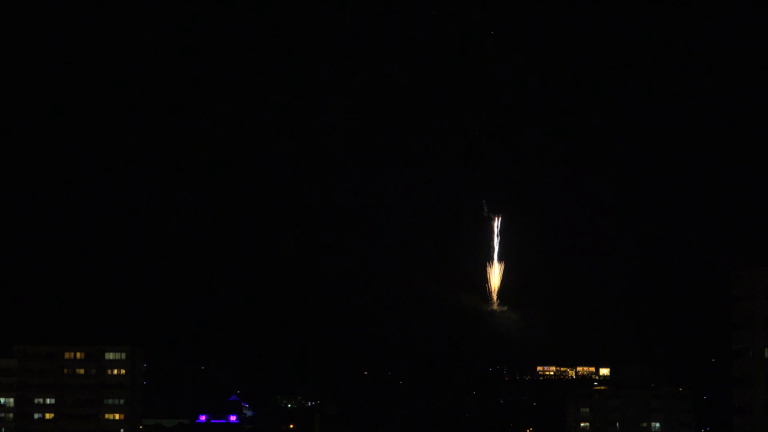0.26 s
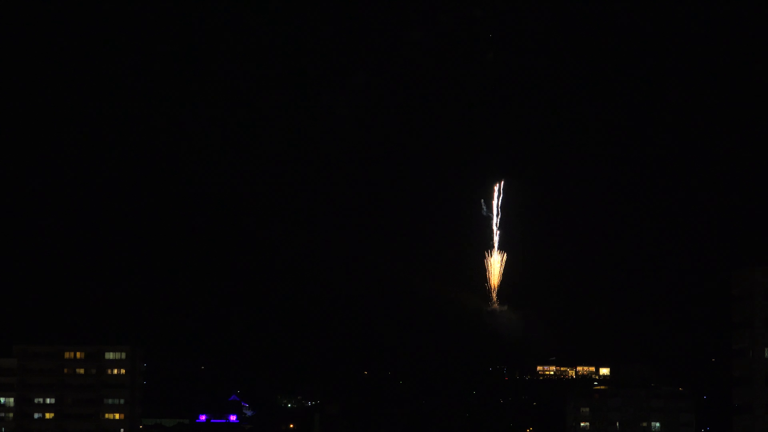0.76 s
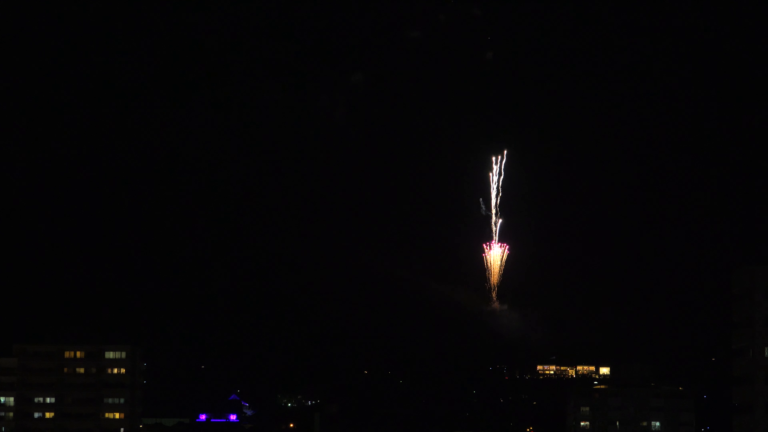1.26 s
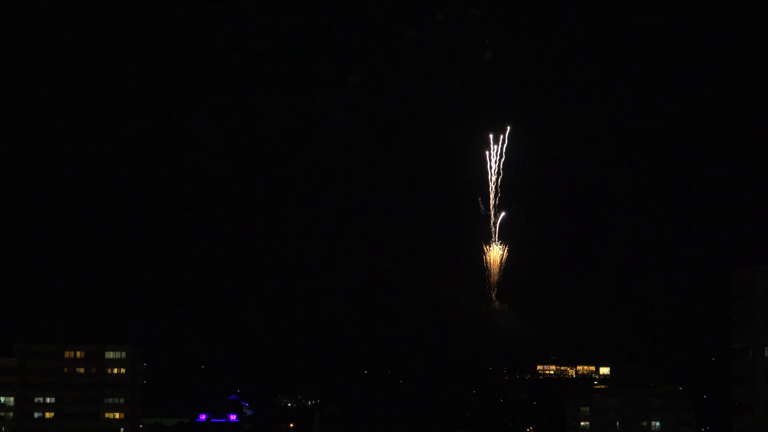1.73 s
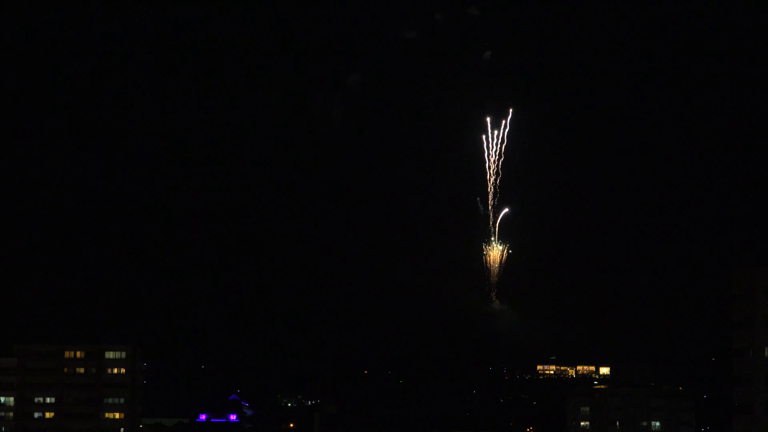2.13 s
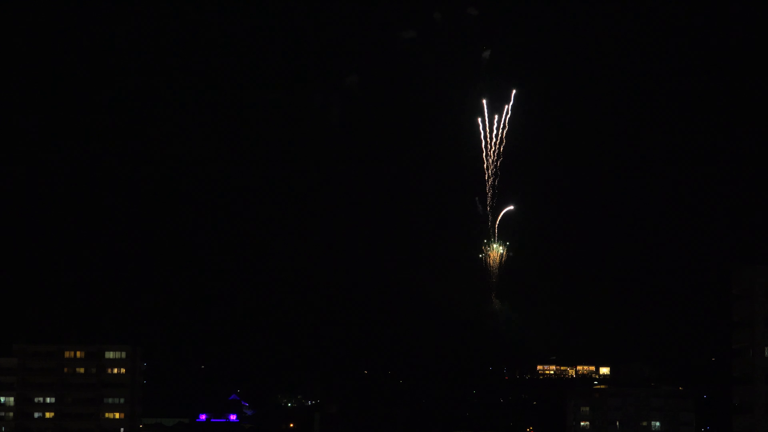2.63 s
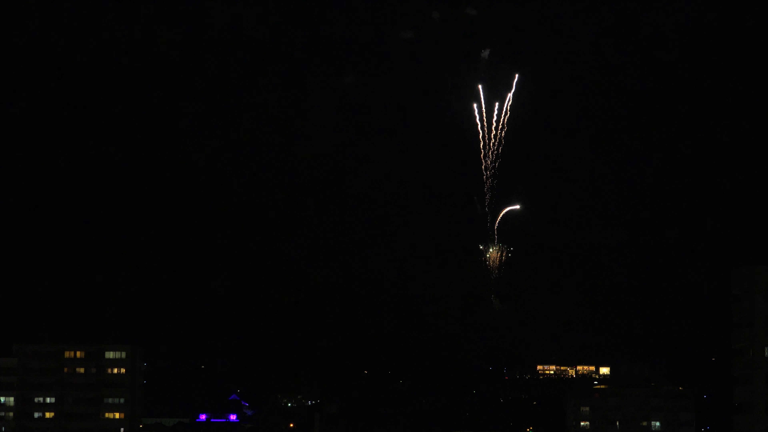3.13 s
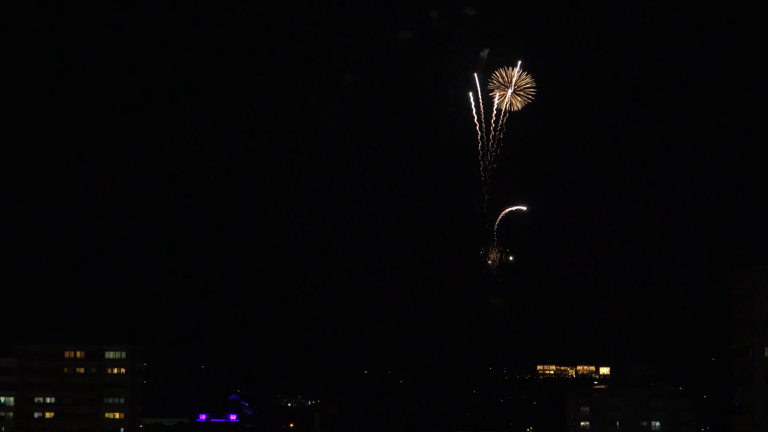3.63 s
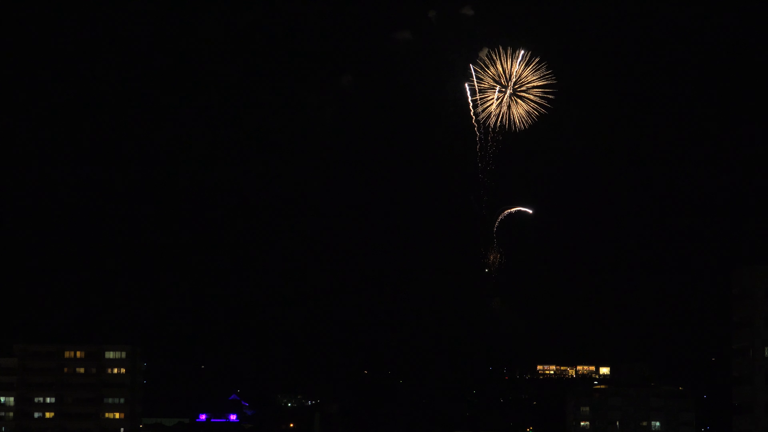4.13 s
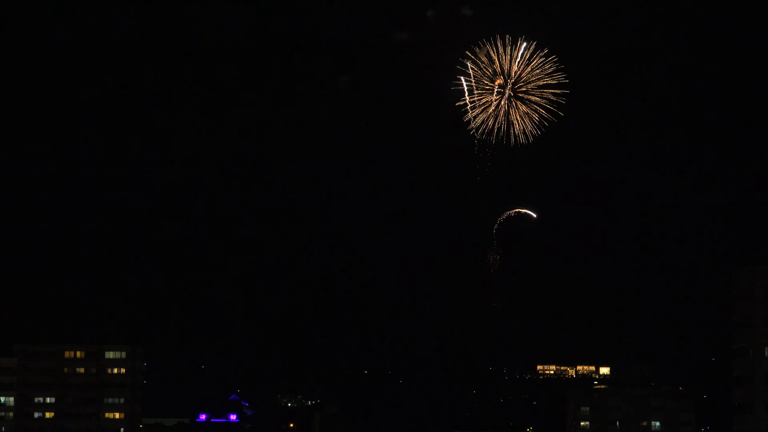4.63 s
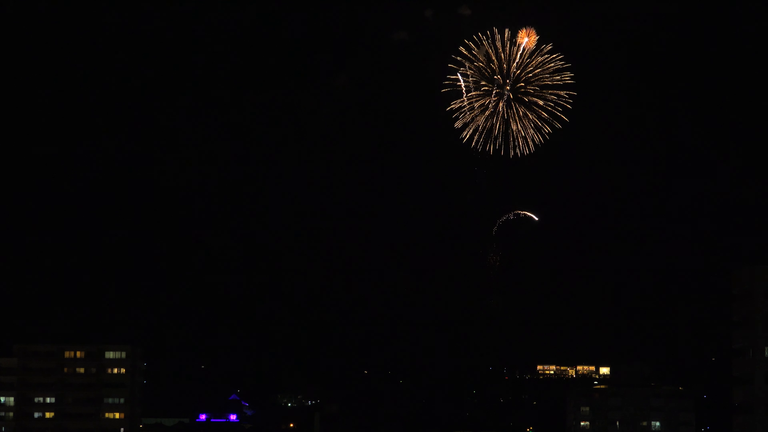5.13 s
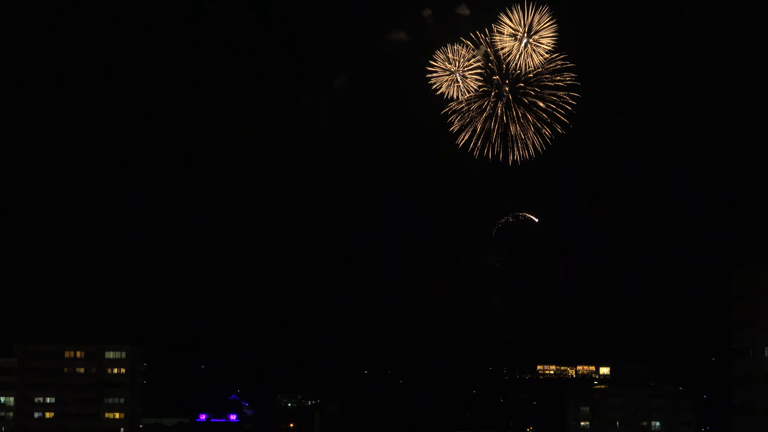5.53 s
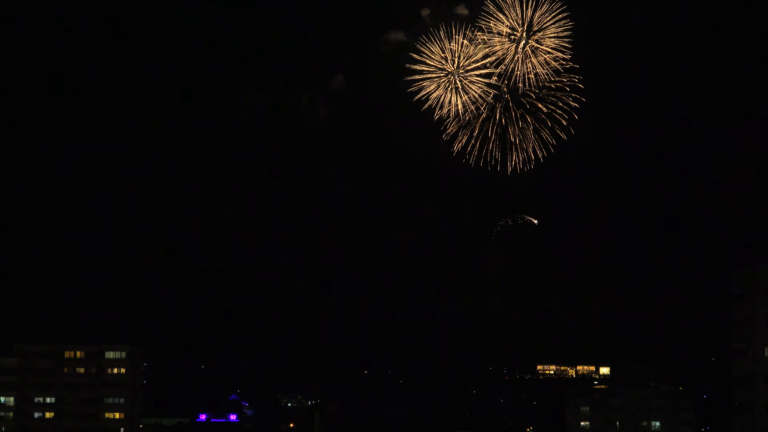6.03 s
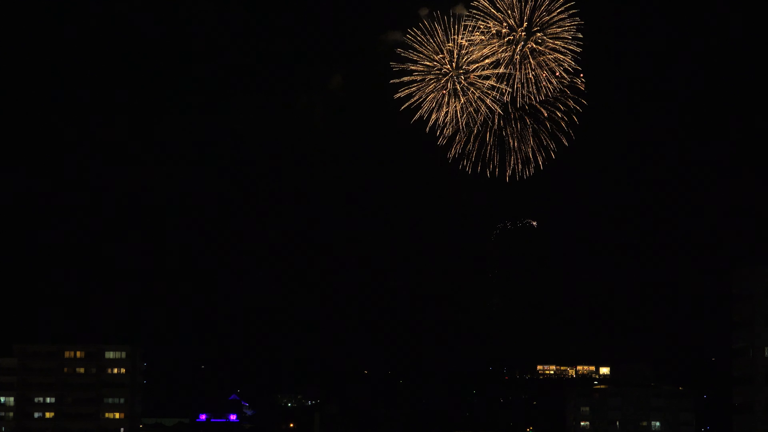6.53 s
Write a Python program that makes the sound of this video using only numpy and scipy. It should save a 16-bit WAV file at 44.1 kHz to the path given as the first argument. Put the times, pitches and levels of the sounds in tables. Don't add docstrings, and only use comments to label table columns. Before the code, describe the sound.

A night city heard in stereo from a balcony: low, slightly uneven distant traffic hum throughout, leaning left, with extremely faint microphone hiss and thin high steady whistles. At about 1.0 s a far firework shell booms, deep and dulled by distance; close walls repeat it within hundredths of a second, giving a short hollow ring. Echoes roll through streets, swelling around 1.5 s, with distinct facade thuds at roughly 1.1, 1.5, 1.75, 2.15 and 2.3 s, then fading. A very faint crackle of burning stars lies around 2.2 s. At 3.87 s a second, stronger boom hits, followed by thuds near 4.1, 4.2, 4.4 and 4.8 s and another rumbling tail. Its dull, faint crackle peaks around 5.1 s. All along, a car approaches from the right, its tyre rush growing gradually, with increasing sizzle, nearest around 6.1 s and still hissing at the end.

```python
import sys
import numpy as np
from scipy import signal
from scipy.io import wavfile
from scipy.ndimage import uniform_filter1d

SR = 44100
rng = np.random.default_rng(int(sys.argv[2]) if len(sys.argv) > 2 else 0)


def field_ratio(decibels):
    return 10 ** (np.asarray(decibels, dtype=float) / 20)


def put_to_file(sound):
    columns = np.atleast_2d(sound).T
    safe = np.clip(columns, -1, 1)
    whole_steps = np.round(safe * 32767)
    wavfile.write(sys.argv[1], SR, whole_steps.astype(np.int16))


N = 298557


def rms_one(x):
    return x / np.sqrt(np.mean(x ** 2) + 1e-20)


def at_hz(points, hz):
    curve_hz, curve_db = np.array(points).T
    return np.interp(np.log(hz), np.log(curve_hz), curve_db)


def band(x, low_hz, high_hz):
    return signal.sosfilt(signal.butter(2, [low_hz, high_hz], "band", fs=SR, output="sos"), x)


def low_pass(x, hz, order):
    return signal.sosfilt(signal.butter(order, hz, fs=SR, output="sos"), x)


def sides(pan_db):
    return field_ratio(np.array([[pan_db / 2], [-pan_db / 2]]))


def stereo(mid, side, alike):
    alike = np.clip(alike, 0, 1)
    return np.sqrt(1 + alike) * mid + np.sqrt(1 - alike) * side * [[1], [-1]]


def drift(rate_hz):
    r = np.exp(-80 * np.pi * rate_hz / SR)
    steps = rng.standard_normal(N // 40 + 2002)
    return rms_one(signal.lfilter([1], [1, -2 * r, r * r], steps)[2000:])


# (pitch_hz, likeness 0 to 1)
LIKENESS = [(60, 0.64), (180, 0.72), (530, 0.66), (1570, 0.37), (4650, 0.02), (13800, 0.03)]
# (pitch_hz, left_over_right_db)
LEAN = [(60, 7.5), (230, 1.5), (910, 1), (3540, 2.0), (13800, -6)]


def banded_noise(spectrum, patchy_db, more_alike, more_left_db, low_hz, high_hz):
    out = np.zeros((2, N))
    together = drift(2.5)
    centres = 25 * 2 ** np.arange(0, 9.2, 1 / 3)
    white = rng.standard_normal((2, 2, N + 8000))
    for k, hz in enumerate(centres[(centres > low_hz) & (centres < high_hz)]):
        flicker = field_ratio(at_hz(spectrum, hz) + patchy_db * (.5 * together + drift(30)))
        gain = np.interp(np.arange(N) / 40, np.arange(len(flicker)), flicker)
        mid, side = band(white[k % 2], hz / 1.122, hz * 1.122)[:, -N:] * gain
        both = stereo(mid, side, at_hz(LIKENESS, hz) + more_alike)
        out += sides(at_hz(LEAN, hz) + more_left_db) * both
    return out / np.sqrt(np.mean(out.mean(axis=0) ** 2))


# (pitch_hz, level_db per Hz)
HUM_TONE = [(15, -57), (25, -19.5), (70, -5.5), (133, -8), (229, -3), (266, -4), (340, -14), (414, -9),
            (504, -11.5), (695, -12.5), (767, -12.5), (981, -10.5), (1530, -16), (2500, -36), (9000, -59.5),
            (11700, -90), (19800, -120)]


def traffic_hum():
    return field_ratio(-44.5) * banded_noise(HUM_TONE, patchy_db=1.0, more_alike=0.066, more_left_db=1.1,
                                     low_hz=20, high_hz=9000)


# (pitch_hz, level_db per Hz)
HISS_TONE = [(4120, -26), (7000, -6), (10400, -9.5), (13300, -3.5), (13500, -2)]


def hiss():
    noise = field_ratio(-83.5) * banded_noise(HISS_TONE, patchy_db=-1.2, more_alike=.01, more_left_db=6.5,
                                      low_hz=4500, high_hz=15000)
    return signal.sosfilt(signal.cheby2(8, 30, 13750, fs=SR, output="sos"), noise)


# (pitch_hz, level_db rms)
WHISTLE_TONES = [(4000, -92), (6001, -98), (10001, -103), (11994, -109), (13937, -98)]


def whistles():
    t = np.arange(N) / SR
    return sum(np.sqrt(2) * field_ratio(db) * np.sin(2 * np.pi * hz * t) for hz, db in WHISTLE_TONES)


def delayed(x):
    lag = 2
    return np.concatenate([np.full(lag, x[0]), x[:-lag]])


def from_left(x):
    return np.array([x[0], delayed(x[1])])


CAR_KM_H, CAR_PASSES_S, CAR_NEAREST_M, SIZZLE_TRAIL_M = 39.3, 6.1, 22.4, 2.7
CAR_NEAREST_DB, CAR_FALL_DB_PER_DECADE = -45.5, 27.5
CAR_BRIGHT_DB, CAR_BRIGHT_FOLLOWS = -2.5, -0.28
SIZZLE_DB, SIZZLE_RISE_DB_PER_S = -2, 5
# (pitch_hz, level_db per Hz)
CAR_TONE = [(180, -35.5), (300, 2), (393, -15.5), (428, -11.5), (611, -0.5), (666, -6), (778, 0),
            (1260, -4.5), (2570, -18), (6310, -31.5), (9000, -59), (11700, -76), (19800, -120)]


def car():
    to_pass_s = np.arange(N) / SR - CAR_PASSES_S
    along_m = CAR_KM_H / 3.6 * to_pass_s
    distance_m = np.hypot(along_m, CAR_NEAREST_M)
    loss_db = CAR_FALL_DB_PER_DECADE * np.log10(distance_m / CAR_NEAREST_M)
    rush = banded_noise(CAR_TONE, patchy_db=0.1, more_alike=0.26, more_left_db=1.5,
                        low_hz=230, high_hz=9000)
    tyres = field_ratio(CAR_NEAREST_DB - loss_db) * rush
    dull = low_pass(tyres, 4100, order=2)
    bright = field_ratio(CAR_BRIGHT_DB - CAR_BRIGHT_FOLLOWS * loss_db) * (tyres - dull)
    trailing = np.roll(tyres, int(SIZZLE_TRAIL_M / CAR_KM_H * 3.6 * SR), axis=1)
    sizzle_gain = field_ratio(SIZZLE_DB + SIZZLE_RISE_DB_PER_S * to_pass_s)
    sizzle = sizzle_gain * band(band(trailing, 5700, 6900), 5700, 6900)
    left, right = dull + bright + sizzle
    return np.array([delayed(left), right])


def clicks(times_s, gains):
    out = np.full(N, 1e-18)
    np.add.at(out, (np.asarray(times_s) * SR).astype(int), gains)
    return out


def blast(x, hz, suction_hz):
    rounded = signal.bessel(4, hz, fs=SR, output="sos", norm="mag")
    suction = signal.butter(1, suction_hz, "high", fs=SR, output="sos")
    return signal.sosfilt(np.vstack([rounded, suction]), x) * SR / hz / 2


def scattered(per_s, spread_db, alike):
    sizes = np.minimum(rng.exponential(1, (2, N)), 5)
    pulses = rng.choice([-1., 1.], (2, N))
    hits = rng.random((2, N)) < per_s / SR
    pulses[hits] *= field_ratio(spread_db * sizes[hits])
    mid, side = pulses * hits + 1e-18
    return stereo(mid, side, alike)


# (pitch_hz, width_hz, level_db)
BALCONY = [(58, 25.3, -2.5), (79, 16.2, 0.5), (92.2, 14.5, 3), (169, 17.6, -1.5), (282.7, 56, -4.5),
           (395, 106, -8), (806, 560, -4.5)]


def balcony(x, direct_db):
    out = field_ratio(direct_db) * x
    for k, (hz, width_hz, db) in enumerate(BALCONY):
        r = np.exp(-np.pi * width_hz / SR)
        ring = [1, -2 * r * np.cos(2 * np.pi * hz / SR), r * r]
        out = out + (-1) ** k * field_ratio(db) * signal.lfilter([1 - r, 0, r - 1], ring, x)
    return out


BURST_S = np.array([.9919, 3.8651])
# (blast_peak_db, low_push_db, wall_scatter_db)
BOOMS = [(-11, -5.5, -22.5), (-6, -6, -22.5)]
WALL_DELAY_S = [.0025, .0052, .0069, .0095, .0128, .0280, .0307]
# (first_shell_db, second_shell_db, left_over_right_db)
WALLS = [(-8, -8, 3), (-7, -4, 1), (-8, -13, 0), (-14, -14, 4), (-2, -22, 3), (-22, -12, 6), (-11, -22, 6)]
PUSH_HZ, PUSH_LAG_S = 79.4, .0032
PUSH_T60_S, SCATTER_T60_S = 0.054, 0.14


def shells():
    blast_db, push_db, scatter_db = np.transpose(BOOMS)
    arrivals = clicks(BURST_S, field_ratio(blast_db)) * sides(3.6)
    for delay_s, (*repeat_db, pan_db) in zip(WALL_DELAY_S, WALLS):
        repeats = clicks(np.add(BURST_S, delay_s), field_ratio(blast_db + repeat_db))
        arrivals = arrivals + repeats * sides(pan_db)
    pulses = blast(arrivals, 570, suction_hz=190)
    ringing = field_ratio(13.0) * band(balcony(pulses, direct_db=-25.5), 149, 327)
    later_s = np.add(BURST_S, PUSH_LAG_S)
    r, w = field_ratio(-60 / (PUSH_T60_S * SR)), 2 * np.pi * PUSH_HZ / SR
    push = signal.lfilter([0, -np.sin(w)], [1, -2 * r * np.cos(w), r * r], clicks(later_s, field_ratio(push_db)))
    fade = field_ratio(-60 / (SCATTER_T60_S * SR))
    dying = signal.lfilter([1], [1, -fade], clicks(later_s, field_ratio(scatter_db)))
    scatter = dying * rms_one(band(scattered(2600, spread_db=-1.0, alike=0.55), 300, 900))
    boom = pulses + ringing + push * sides(6.0) + scatter * sides(1.2)
    crack = field_ratio(-24) * band(arrivals, 2400, 4000)
    return low_pass(boom, 1950, order=4) + crack


def since_bursts():
    return np.subtract.outer(np.arange(N) / SR, BURST_S).T


def swell(t, centre_s, width_s):
    return np.exp(-.5 * ((t - centre_s) / width_s) ** 2)


def evened(x, share):
    power = uniform_filter1d(np.mean(rms_one(x) ** 2, axis=0), size=2600)
    return rms_one(x / (np.abs(power) + 0.046) ** (share / 2))


# (low_hz, high_hz, near_streets_db, far_city_db, swell_db, left_over_right_db)
ROLL_LAYERS = [(45, 137, -24, -36, -33.5, 6), (145.3, 192, -39, -40, -37.5, 3.5),
               (237, 468, -29.5, -40, -36, 3.5), (436, 870, -43, -55.5, -48, 3.5),
               (870, 1420, -46.5, -57, -55.5, 2)]
ROLL_DB = [(.2, 1.5, -1.1, -1.4, -.4), (1.5, 0.6, 1, 1.8, .4)]
# (after_burst_s, half_width_s, level_db)
BLOCKS = [(.17, 0.031, -14), (.32, 0.033, -6.5), (.56, 0.08, -0.2), (.79, 0.052, -6.5),
          (1.12, 0.017, -11.5), (2.15, 0.22, -17)]
NEAR_FADE_DB_PER_S, FAR_FADE_DB_PER_S = 69, 7


def rolling():
    echoes = balcony(scattered(1200, spread_db=1.5, alike=0.74), direct_db=-24.5)
    age_s = since_bursts()
    start = np.clip((age_s - .014) / .03, 0, 1)
    age_s = np.maximum(age_s, 0)
    near = field_ratio(-NEAR_FADE_DB_PER_S * age_s)
    far = field_ratio(-FAR_FADE_DB_PER_S * age_s)
    rows = sum(field_ratio(db) * swell(age_s, s, width_s) for s, width_s, db in BLOCKS)
    powers = (start * [near, far, rows]) ** 2
    out = 0
    for (low_hz, high_hz, *part_db, pan_db), burst_db in zip(ROLL_LAYERS, np.transpose(ROLL_DB)):
        both_bursts = field_ratio(burst_db) ** 2 @ powers
        gain = np.sqrt(field_ratio(part_db) ** 2 @ both_bursts)
        out = out + gain * evened(band(echoes, low_hz, high_hz), share=0.38) * sides(pan_db)
    return out


# (start_s, peak_db, brightness_db)
FACADES = [(1.039, -21, -2), (1.048, -20, -12), (1.112, -16, -22), (1.508, -22, 1), (1.517, -16.5, -9),
           (1.527, -18, -6), (1.577, -17.5, -30), (1.755, -20.5, -19), (2.108, -28, -17), (2.15, -22, -12),
           (2.302, -19, -15), (2.781, -26, -22), (3.99, -24, -29), (4.078, -19, -16), (4.226, -20.5, -13),
           (4.409, -15.5, -8), (4.658, -24, 3), (4.789, -17.5, -9)]


def facades():
    start_s, db, bright_db = np.transpose(FACADES)
    thud = balcony(blast(clicks(start_s, field_ratio(db - 7.0)), 136, suction_hz=60), direct_db=-6.5)
    edge = blast(clicks(start_s, field_ratio(db + bright_db - 4.5)), 420, suction_hz=250)
    return (thud - edge) * sides(7.6)


CRACKLE_DB = [-61, -48.5]


def crackle():
    gain = field_ratio(CRACKLE_DB) @ swell(since_bursts(), centre_s=1.22, width_s=0.77)
    snaps = rms_one(band(scattered(140, spread_db=3.0, alike=1.0), 420, 1300))
    return gain * low_pass(snaps, 1700, order=4)


def scene():
    left_side = from_left(traffic_hum() + shells() + rolling() + facades())
    return left_side + car() + crackle()


def top_cut(x):
    return signal.sosfilt(signal.butter(12, 14380, fs=SR, output="sos"), x)


def record(dry):
    heard = signal.sosfilt(signal.butter(2, 42, "high", fs=SR, output="sos"), dry)
    return top_cut(heard + hiss() + whistles())


dry = scene()
out = record(dry)
put_to_file(out)
```